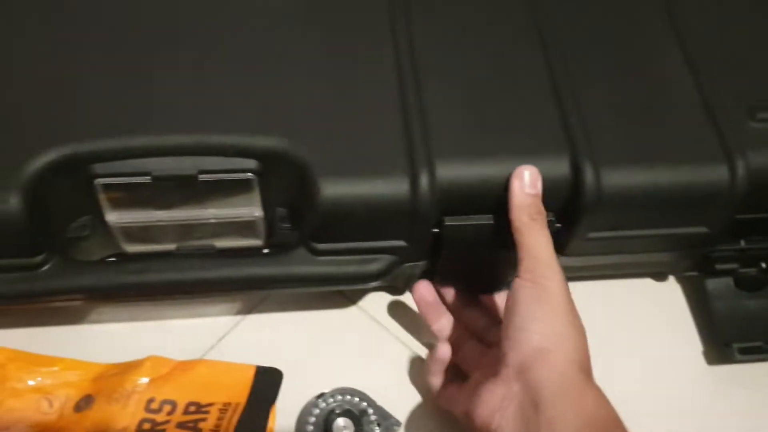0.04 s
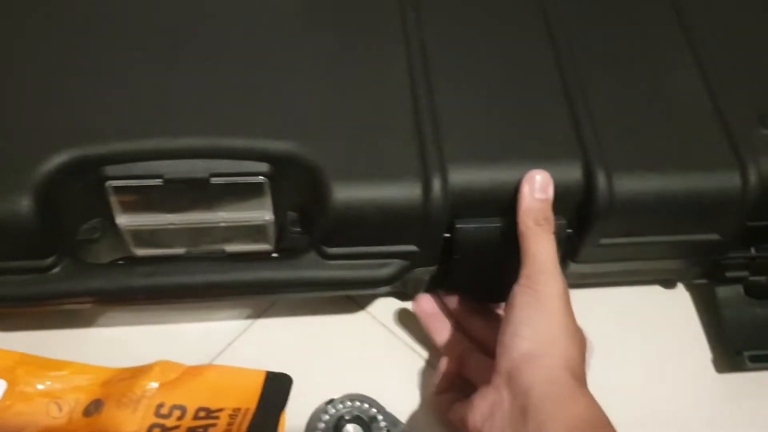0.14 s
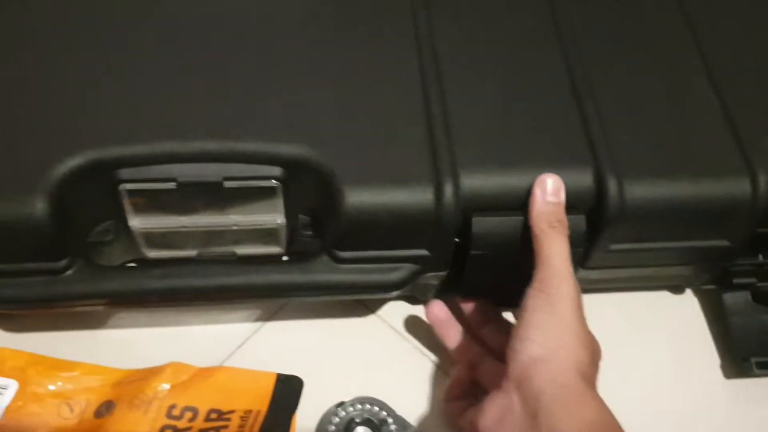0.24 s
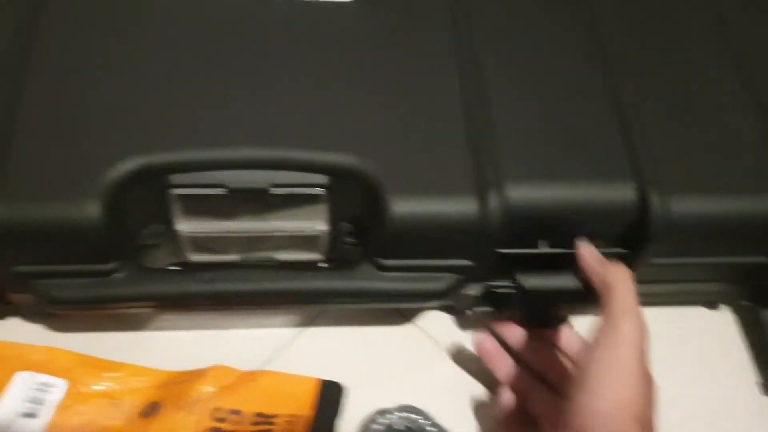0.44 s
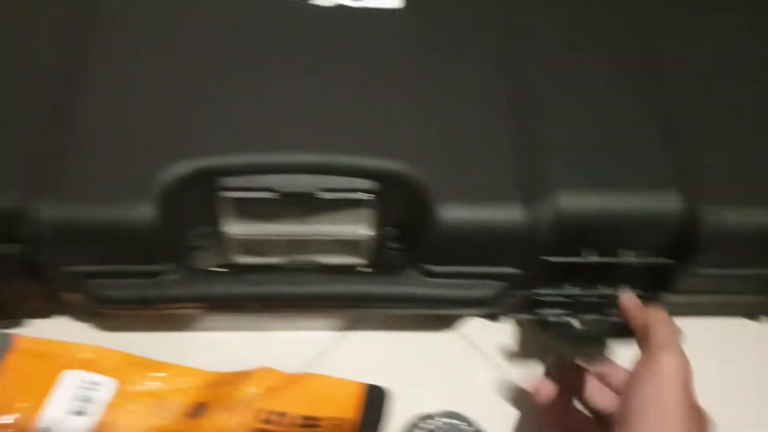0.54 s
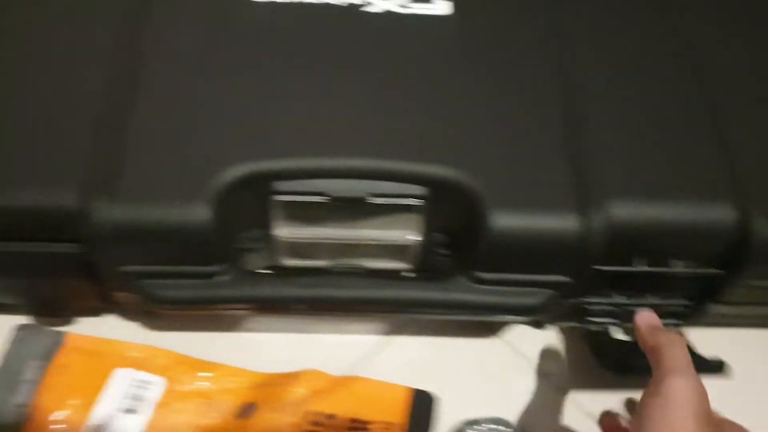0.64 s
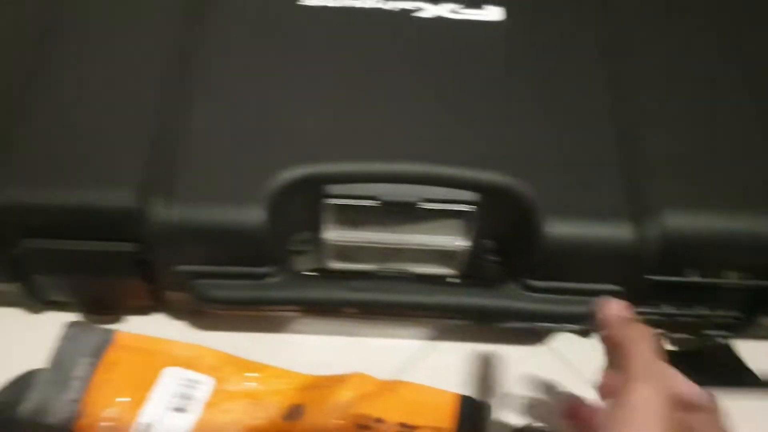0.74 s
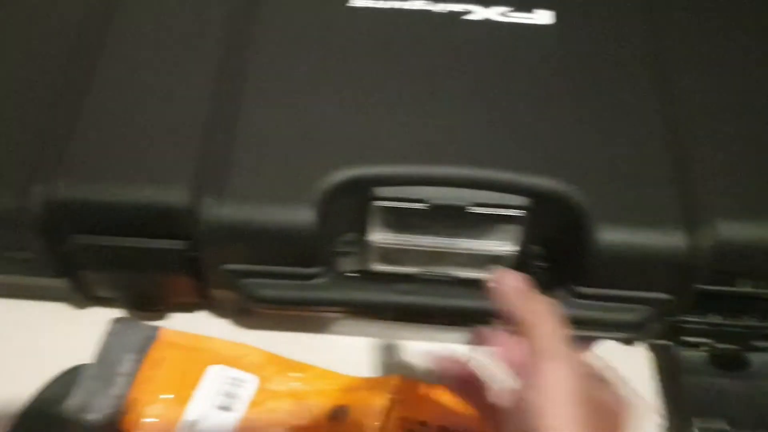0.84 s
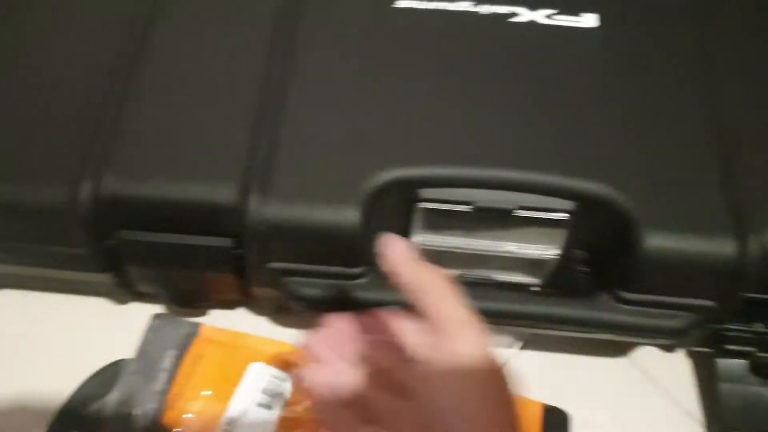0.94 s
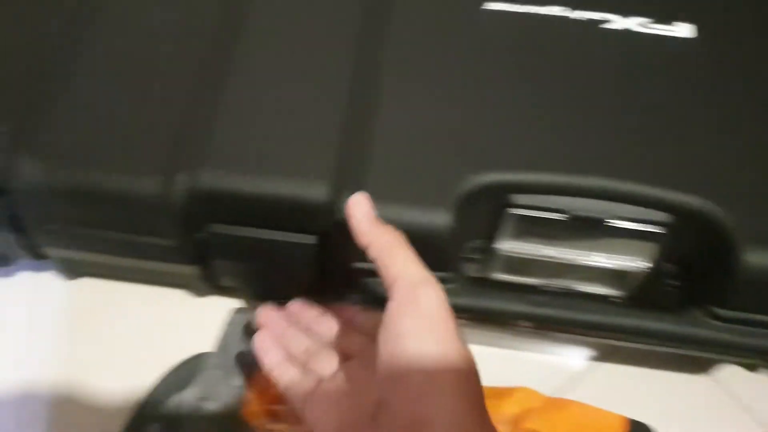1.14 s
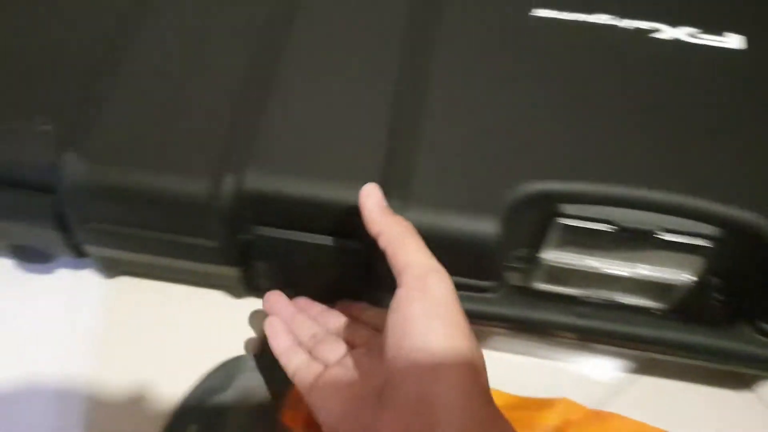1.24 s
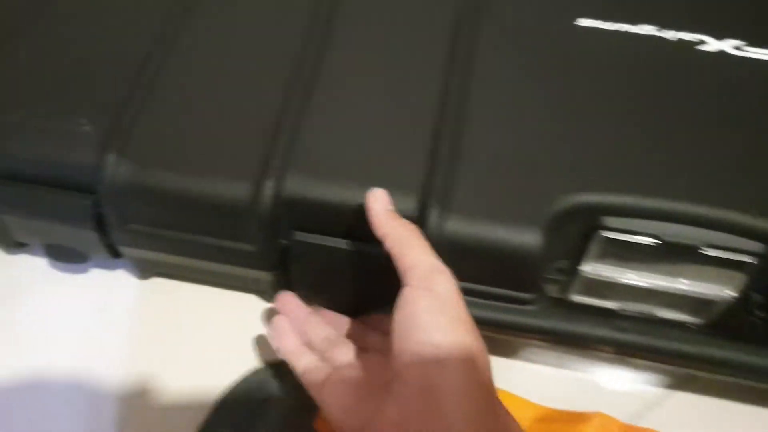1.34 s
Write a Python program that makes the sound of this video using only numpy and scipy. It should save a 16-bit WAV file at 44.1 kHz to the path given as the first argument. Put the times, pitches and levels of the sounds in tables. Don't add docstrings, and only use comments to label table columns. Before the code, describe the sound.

A plastic case latch snaps open with a loud sharp click and a short hollow boom.

```python
import sys
import numpy as np
from scipy import signal
from scipy.io import wavfile
from scipy.ndimage import uniform_filter1d

SR = 44100
rng = np.random.default_rng(int(sys.argv[2]) if len(sys.argv) > 2 else 0)


def generate_wav(signal):
    frames = np.transpose(np.atleast_2d(signal))
    scaled = np.clip(frames, -1, 1) * 32767
    pcm = np.round(scaled).astype(np.int16)
    wavfile.write(sys.argv[1], SR, pcm)


def decibels_to_gain(level_db):
    exponent = np.asarray(level_db, float) / 20
    return 10 ** exponent


N = 61739

# start_s, level_db, left_right_db, favoured_pitch_hz
SNAP_CONTACTS = [(0.2154, -15, 10, 11000), (.2161, -9, 16.5, 3530), (.2169, -12, 6, 3930),
                 (.2182, -21.5, 0, 1723), (0.219, -12, 8, 2380), (.2203, -12.5, 16, 2354),
                 (.2212, -19, 17.5, 2040), (.2221, -12, 10, 7200), (.2229, -17.5, 15, 2210),
                 (.2238, -18.5, 19, 1710), (0.2254, -14.5, 5.5, 1780), (.2275, -20.5, -8, 1180)]
# pitch_hz, level_db, t60_s
LATCH_MODES = [(775, -7, 0.065), (1180, -13.5, 0.061), (1666, -6.5, 0.033), (2322, -6, 0.021),
               (2520, -10, 0.011), (3170, -5, 0.0094), (3555, -3, 0.0063), (4020, -18, 0.0095),
               (5620, -10, 0.009), (7360, -9.5, 0.0072), (9270, -15, 0.0025), (11000, -12.5, 0.0046),
               (12200, -10, 0.0022), (14530, -13.5, 0.0069)]
# pitch_hz, level_db, t60_s
CATCH_MODES = [(716, -23.5, 0.058), (834, -12, 0.036), (1010, -25, 0.011), (1362, -22, 0.054),
               (1900, -19.5, .015), (2140, -13.5, 0.014), (2653, -22, 0.021), (4500, -30, .01),
               (4930, -17, 0.0061), (6470, -10, .006)]
# pitch_hz, left_right_db
LATCH_LEAN = [(800, -1.5), (3000, 1.5), (6000, -1), (8000, 7), (13000, -2)]
# start_s, level_db, softness_hz, direction (+1 push, -1 rebound)
SHELL_PUSHES = [
    (0.2139, -21, 500, 1),
    (0.2165, -18, 775, -1),
    (0.2195, -28.5, 900, 1),
    (0.2237, -12, 900, 1),
    (0.2258, -16.5, 810, -1),
    (0.2285, -19.5, 583, 1),
]
# pitch_hz, level_db, t60_s, left_right_db
SHELL_MODES = [(50.7, -8, 0.29, 5.5), (67.2, -9, 0.19, 5), (117.3, -17.5, 0.4, 3), (144, -20, 0.053, 3.5),
               (167.6, -4, 0.2, 4), (187.8, -16, 0.273, 2), (209.7, -1, 0.07, 7), (222.5, -25, 0.45, 3),
               (258.6, -10.5, 0.14, 8), (282, -29.5, 0.19, 3.5), (357, -5, 0.037, 5.5),
               (395, -19.5, 0.347, 4), (500, -31, 0.33, 13), (611, -33, 0.44, 5)]
# pitch_hz, level_db (per Hz)
TAIL_COLOUR = [(150, -8.5), (250, -3.5), (586, -11), (875, -8), (1080, -15), (1610, -11.5), (3840, -21),
               (11900, -38.5), (16000, -42)]
# pitch_hz, t60_s
TAIL_DECAY = [(250, 0.29), (1000, 0.31), (4000, 0.31), (15000, 0.42)]
# start_s, level_db, left_right_db, favoured_pitch_hz
DROP_CONTACTS = [
    (.4985, -43, 16, 1200),
    (.5002, -40.5, 19, 2320),
    (.5023, -43, 15, 1290),
    (.5038, -46, 4, 1200),
    (.5075, -62, -1, 900),
]
# start_s, level_db, softness_hz, direction
DROP_KNOCKS = [
    (.4979, -43, 1500, 1),
    (.4997, -40, 2200, -1),
    (.5022, -44, 2200, -1),
    (.5035, -42, 1300, -1),
    (.5071, -41, 700, -1),
    (.5094, -39, 230, 1),
]
# start_s, level_db, favoured_pitch_hz
HAND_BUMPS = [(.003, -46.5, 151), (0.091, -44, 420), (0.126, -49, 303), (0.162, -55, 240),
              (0.319, -34, 193), (0.404, -43, 216), (.37, -34, 118), (0.43, -36.5, 119),
              (0.459, -41.5, 142), (0.474, -45, 240), (0.5, -45, 420), (0.507, -35, 54), (0.508, -57, 198),
              (.52, -49, 500), (.53, -47.5, 169), (.56, -52.5, 170), (.595, -48.5, 123),
              (0.634, -53.5, 156), (.71, -54, 133), (0.746, -47, 214), (.764, -48, 243),
              (0.781, -49.5, 394), (0.815, -53, 214), (.835, -57, 202), (.931, -46.5, 398),
              (0.947, -47, 171.4), (.965, -50, 172), (0.984, -45.5, 289), (.994, -55, 355),
              (1.006, -54.5, 169), (1.051, -56, 168), (1.285, -58.5, 500), (1.305, -58, 410),
              (1.325, -50, 183), (1.346, -50, 343), (1.363, -44, 51.7), (1.384, -45, 52), (1.372, -60, 410)]
# start_s, level_db
GRIP_RUMBLE = [
    [(0.0, -67), (0.048, -61.5), (0.09, -65.5), (0.102, -67), (0.18, -60), (0.2, -50)],
    [(0.36, -42), (0.486, -77), (0.512, -53), (0.822, -66), (1.006, -66), (1.152, -85), (1.194, -68),
     (1.246, -80), (1.4, -46.5)],
]
# start_s, level_db, hiss_centre_hz, broad_part_db
SKIN_SLIDE = [(0, -79.5, 13900, 3.5), (.11, -78, 13500, 0.5), (.14, -77.5, 13600, 3.5),
              (.2, -83, 13500, 2.5), (.28, -76, 13460, -3.5), (.42, -76.5, 13500, 0), (.45, -69, 13440, -5),
              (.49, -74.5, 13700, -1), (.585, -74.5, 13200, -7.5), (.605, -75, 12150, -2),
              (.65, -86, 10440, 6.5), (.73, -86.5, 11300, 7.5), (.755, -75, 11300, -2),
              (.88, -94.5, 11000, 8.5), (1.262, -99, 11620, 15), (1.285, -88.5, 11600, 15.5),
              (1.35, -87, 11400, 12.5), (1.4, -85.5, 12200, 9.5)]
# start_s, level_db
SKIN_SQUEAK = [(0, -95), (.11, -92), (.135, -78), (.2, -79), (.26, -92), (.3, -105)]
# start_s, level_db
HUM_SWELL = [(0, -66), (.07, -69), (.18, -67.5), (.45, -76.5), (.8, -69.5), (1.18, -71.5), (1.24, -77),
             (1.3, -70.5), (1.4, -68)]
# start_s, level_db
WHINE_SWELL = [(0, -82), (.3, -71), (.4, -70.5), (.62, -70.5), (.72, -78.5), (.84, -83), (.89, -77),
               (1.2, -72.5), (1.25, -80)]
# pitch_hz, level_db (per Hz)
AIR_COLOUR = [(50, -1.5), (95, -10.5), (170, -5.5), (600, -12), (2300, -10.5), (3900, -17), (4900, -24),
              (16000, -34)]
# pitch_hz, likeness (0 to 1)
EAR_LIKENESS = [(60, 0.95), (250, 0.8), (500, 0.55), (1200, 0.029), (5000, 0.0089)]
# pitch_hz, left_right_db
NOISE_LEAN = [(60, 11.5), (500, 4), (1400, 7), (3200, 10), (6000, -4.5), (12000, 5)]

LATCH_DB, SPREAD_DB = -8.5, 2.5
CRACK_DB, CRACK_T60_S = -9.5, 0.004
FAVOUR_DB, FAVOUR_OCT = 10, 0.37
SIZZLE_DB, SIZZLE_T60_S = -12.5, 0.004
BUMP_FAVOUR_DB, BUMP_OCT, BUMP_SOFT_HZ, BUMP_T60_S = 21, 0.26, 900, 0.12
TAIL_DB, TAIL_START_S, TAIL_RISE_S = -27.5, 0.2217, 0.013
EARLY_DB, EARLY_T60_S = -3.5, 0.048
DROP_CUT_HZ, DROP_DAMPING = 2800, 0.26
KNOCK_LOW_HZ, KNOCK_DB = 110, 19
SCUFF_DB, SCUFF_T60_S = -11.5, 0.062
SLIDE_WIDTH_HZ, BROAD_LOW_HZ, RUSTLE_DB = 520, 6440, 6
SQUEAK_HZ = 15000
HUM_HZ, WHINE_HZ = 582.6, 3441.5
AIR_DB, AIR_EDGE_HZ, AIR_ABOVE_DB = -61, 7300, -36
BOTTOM_HZ, TOP_HZ = 40.3, 16000


def rms_one(x):
    return x / np.sqrt(np.mean(x ** 2) + 1e-20)


def in_time(rows):
    s, *columns = np.transpose(rows)
    return [np.interp(np.arange(N) / SR, s, column) for column in columns]


def at_hz(points, hz):
    pitch_hz, value = np.transpose(points)
    return np.interp(np.log(hz), np.log(pitch_hz), value)


def pan(db):
    return decibels_to_gain(np.array([[db / 2], [-db / 2]]))


def band(x, low_hz, high_hz, order=2):
    return signal.sosfilt(signal.butter(order, [low_hz, high_hz], "band", fs=SR, output="sos"), x)


def drift(rate_hz):
    r = np.exp(-2 * np.pi * rate_hz * 40 / SR)
    slow = signal.lfilter([1], [1, -2 * r, r * r], rng.standard_normal(N // 40 + 2002))[2000:]
    return np.interp(np.arange(N) / 40, np.arange(len(slow)), rms_one(slow))


def ring(clicks, hz, t60):
    r, w = decibels_to_gain(-60 / (t60 * SR)), 2 * np.pi * hz / SR
    return signal.lfilter([0, np.sin(w)], [1, -2 * r * np.cos(w), r * r], clicks + 1e-18)


def noise_bursts(clicks, t60):
    envelope = signal.lfilter([1], [1, -decibels_to_gain(-60 / (t60 * SR))], clicks + 1e-18)
    return envelope * rng.standard_normal((2, N))


def soft(s, db, soft_hz):
    t = np.maximum(np.arange(N) / SR - s, 0)
    w = 2 * np.pi * soft_hz
    return decibels_to_gain(db) * t * np.exp(-w * t) * w ** 2 / SR


def favour(hz, centre_hz, boost_db, octaves=FAVOUR_OCT):
    return boost_db * np.exp(-(np.log2(hz / centre_hz) / octaves) ** 2)


def banded_noise(colour, shape, patchy_db):
    out, power = 0, 0
    edges = 30 * 2 ** np.arange(0, 9.3, 1 / 3)
    white = rng.standard_normal((2, 2, N))
    for k, (low, high) in enumerate(zip(edges, edges[1:])):
        mid, side = band(white[k % 2], low, high)
        hz = np.sqrt(low * high)
        alike = np.clip(at_hz(EAR_LIKENESS, hz), 0, 1)
        gain = decibels_to_gain(at_hz(colour, hz))
        pair = np.sqrt(1 + alike) * mid + np.sqrt(1 - alike) * side * [[1], [-1]]
        envelope = gain * shape(hz) * decibels_to_gain(patchy_db * drift(6.4))
        out = out + envelope * pan(at_hz(NOISE_LEAN, hz)) * pair
        power += gain ** 2 * (high - low) * 2 / SR
    return out / np.sqrt(power)


def latch(contacts, damping=1, modes=LATCH_MODES, crack_db=CRACK_DB):
    s, db, side_db, centre_hz = np.transpose(contacts)
    at = (s * SR).astype(int)
    luck = rng.standard_normal((len(s), 2, len(modes)))
    sign = rng.choice([-1, 1], (len(s), 2, len(modes)))
    sizes = decibels_to_gain(db + np.outer([.5, -.5], side_db))
    out = np.zeros((2, N))
    for k, (hz, level_db, t60) in enumerate(modes):
        ears = sign[:, [0, 0 if hz < 2000 else 1], k].T
        strike_db = LATCH_DB + level_db + favour(hz, centre_hz, FAVOUR_DB) + SPREAD_DB * luck[:, :, k].T
        clicks = np.zeros((2, N))
        clicks[:, at] = sizes * decibels_to_gain(strike_db) * ears
        out += pan(at_hz(LATCH_LEAN, hz)) * ring(clicks, hz, t60 * damping)
    clicks = np.zeros((2, N))
    clicks[:, at] = sizes
    crack = band(noise_bursts(clicks, CRACK_T60_S), 1000, 4200)
    return out + decibels_to_gain(crack_db) * pan(2.7) * crack


def catch():
    return pan(3.2) * latch(SNAP_CONTACTS, modes=CATCH_MODES, crack_db=-24)


def sizzle():
    s, db, side_db, _ = np.transpose(SNAP_CONTACTS)
    clicks = np.zeros((2, N))
    clicks[:, (s * SR).astype(int)] = decibels_to_gain(.5 * db + np.outer([.25, -.25], side_db))
    burst = band(noise_bursts(clicks, SIZZLE_T60_S), 4300, 15000)
    return decibels_to_gain(SIZZLE_DB - 7.5) * pan(3.0) * burst


def shell():
    force = sum(np.sign(way) * soft(s, db, soft_hz) for s, db, soft_hz, way in SHELL_PUSHES)
    bumps = np.array([soft(s, db, BUMP_SOFT_HZ) for s, db, _ in HAND_BUMPS])
    centre_hz = np.array(HAND_BUMPS)[:, 2]
    out = 0
    for hz, db, t60, side_db in SHELL_MODES:
        touch_db = favour(hz, centre_hz, BUMP_FAVOUR_DB, BUMP_OCT) - BUMP_FAVOUR_DB - 4.5
        touch = decibels_to_gain(touch_db) @ bumps
        boom = decibels_to_gain(db) * ring(force, hz, t60)
        out = out + pan(side_db) * (boom + ring(touch, hz, BUMP_T60_S))
    return out


def room_tail():
    t = np.maximum(np.arange(N) / SR - TAIL_START_S, 0)
    rise = 1 - np.exp(-t / TAIL_RISE_S)
    early = decibels_to_gain(EARLY_DB - 60 * t / EARLY_T60_S)

    def shape(hz):
        late = decibels_to_gain(-60 * t / at_hz(TAIL_DECAY, hz))
        return (hz > 200) * rise * (early + late)

    return decibels_to_gain(TAIL_DB) * banded_noise(TAIL_COLOUR, shape, patchy_db=0.3)


def latch_drop():
    lowpass = signal.butter(4, DROP_CUT_HZ, fs=SR, output="sos")
    return signal.sosfilt(lowpass, latch(DROP_CONTACTS, DROP_DAMPING))


def knocks():
    force = 0
    for s, db, soft_hz, way in DROP_KNOCKS:
        force = force + np.sign(way) * soft(s, db + KNOCK_DB, soft_hz) * 2000 / soft_hz
    return pan(5.5) * band(force, KNOCK_LOW_HZ, DROP_CUT_HZ)


def scuffs():
    t = np.arange(N) / SR
    shape = np.zeros(N)
    for s, db, hz in HAND_BUMPS:
        if (s > .7 or s < .2) and hz > 100:
            shape += decibels_to_gain(db - 60 * np.maximum(t - s, 0) / SCUFF_T60_S) * (t > s)
    grain = shape * (rng.standard_normal((2, N)) + rng.standard_normal(N))
    return decibels_to_gain(SCUFF_DB + 9.5) * pan(5.7) * band(grain + 1e-18, 280, 1100, order=3)


def grip():
    grip_db, = in_time(GRIP_RUMBLE[0] + GRIP_RUMBLE[1])
    low = band(rng.standard_normal(N), 42, 66)
    low = low / np.sqrt(uniform_filter1d(low ** 2, size=1400) + 1e-9)
    return decibels_to_gain(grip_db) * pan(4.2) * rms_one(low)


def sliding_skin():
    db, hz, broad_db = in_time(SKIN_SLIDE)
    lowpass = signal.butter(2, SLIDE_WIDTH_HZ / 2, fs=SR, output="sos")
    slow = signal.sosfilt(lowpass, rng.standard_normal((2, 2, N)))
    turn = 2 * np.pi * np.cumsum(hz) / SR
    narrow = rms_one(slow[0] * np.cos(turn) + slow[1] * np.sin(turn))
    broad = rms_one(band(rng.standard_normal((2, N)), BROAD_LOW_HZ, 14500))
    rustle = rms_one(band(rng.standard_normal((2, N)), 500, 6000, order=1))
    hiss = narrow + decibels_to_gain(broad_db) * (broad + decibels_to_gain(RUSTLE_DB) * rustle)
    return decibels_to_gain(db + 1.2 * drift(10.0)) * pan(4.7) * hiss


def squeak():
    db, = in_time(SKIN_SQUEAK)
    hiss = band(rng.standard_normal((2, N)), SQUEAK_HZ - 350, SQUEAK_HZ + 350)
    return decibels_to_gain(db) * pan(4.0) * rms_one(hiss)


def appliances():
    t = np.arange(N) / SR
    hum_db, = in_time(HUM_SWELL)
    whine_db, = in_time(WHINE_SWELL)
    hum = decibels_to_gain(hum_db + 1.2 * drift(5)) * pan(8.8) * np.sin(2 * np.pi * HUM_HZ * t)
    whine = decibels_to_gain(whine_db) * pan(12.5) * np.sin(2 * np.pi * WHINE_HZ * t)
    return np.sqrt(2) * (hum + whine)


def room_air():
    air = decibels_to_gain(AIR_DB) * banded_noise(AIR_COLOUR, lambda hz: 1, patchy_db=-1.05)
    dull = signal.sosfiltfilt(signal.butter(8, AIR_EDGE_HZ, fs=SR, output="sos"), air)
    return dull + decibels_to_gain(AIR_ABOVE_DB) * (air - dull)


def scene():
    air = room_air()
    drop = latch_drop() + knocks()
    snap = latch(SNAP_CONTACTS) + shell()
    hand = scuffs()
    tail = room_tail()
    hand = hand + grip() + sliding_skin()
    background = air + appliances()
    hand = hand + squeak()
    snap = snap + catch() + sizzle()
    return snap + tail + drop + hand + background


def roll_off(x):
    return signal.sosfilt(signal.butter(12, 16770, fs=SR, output="sos"), x)


def record(dry):
    x = signal.sosfilt(signal.butter(6, BOTTOM_HZ, "high", fs=SR, output="sos"), dry)
    rounded = .98 * np.tanh(x / .98)
    mix = signal.sosfilt(signal.cheby2(14, 27, TOP_HZ + 100, fs=SR, output="sos"), rounded)
    return roll_off(mix)


dry = scene()
out = record(dry)
generate_wav(out)
```